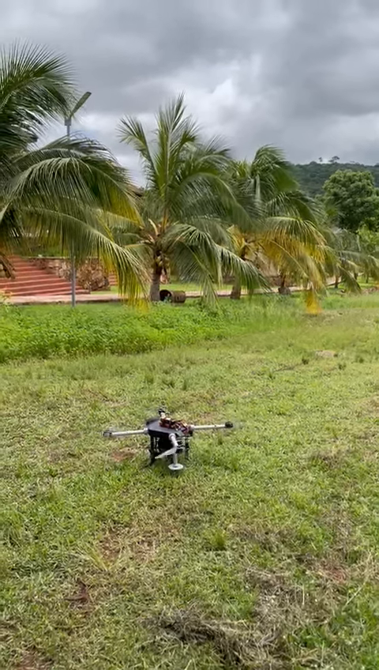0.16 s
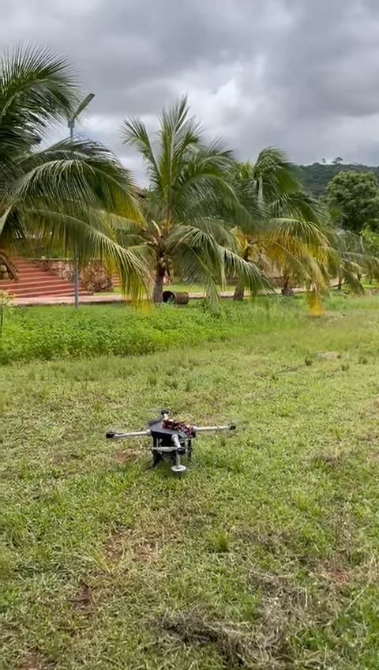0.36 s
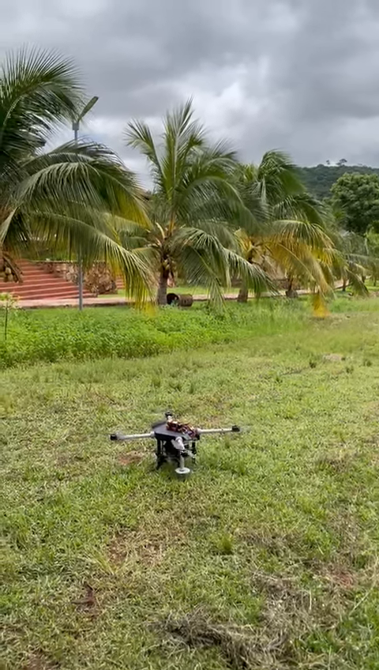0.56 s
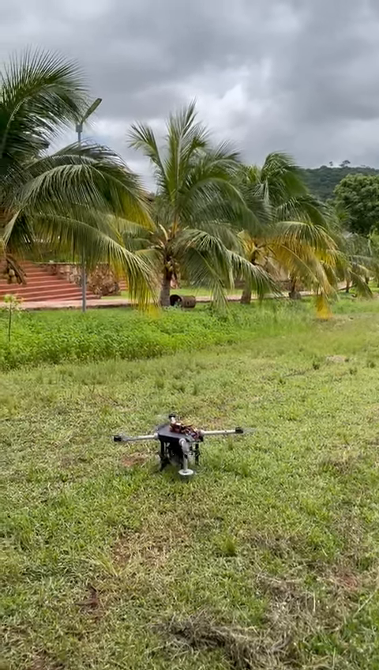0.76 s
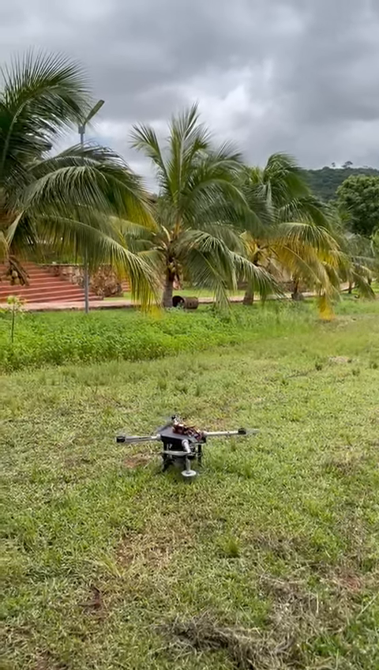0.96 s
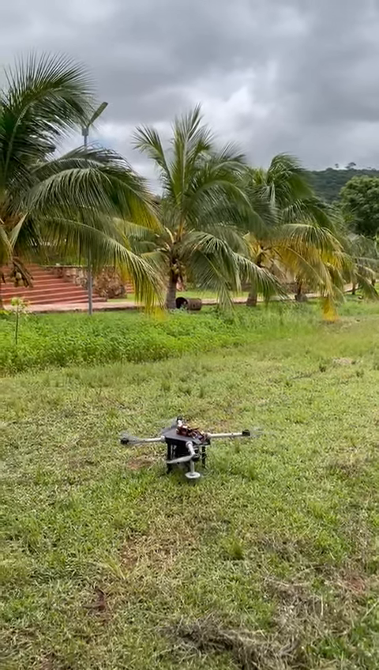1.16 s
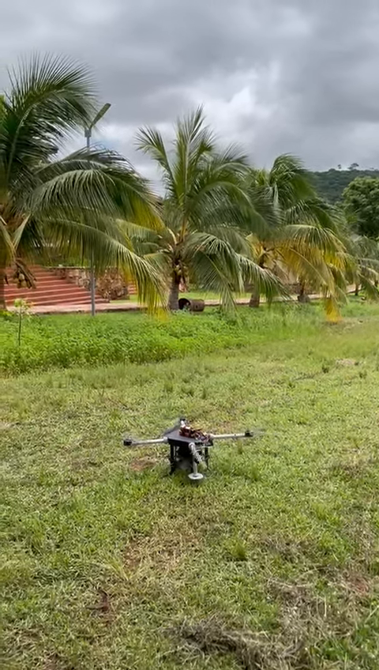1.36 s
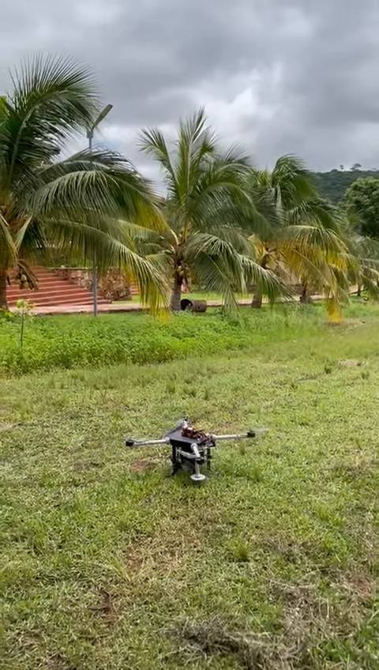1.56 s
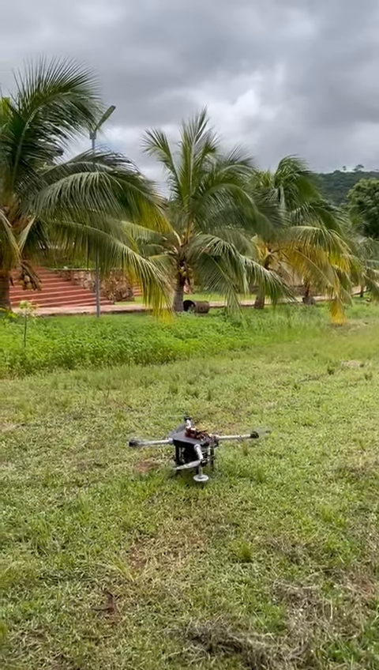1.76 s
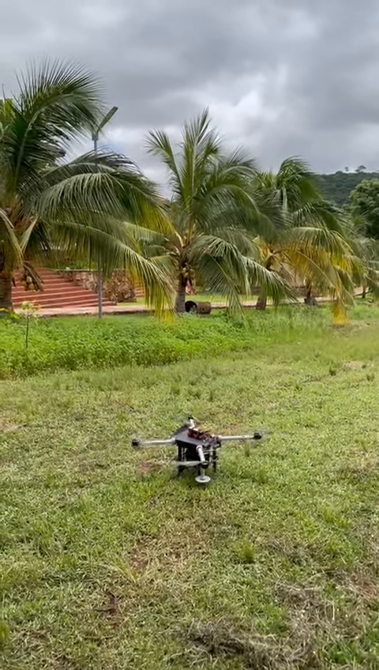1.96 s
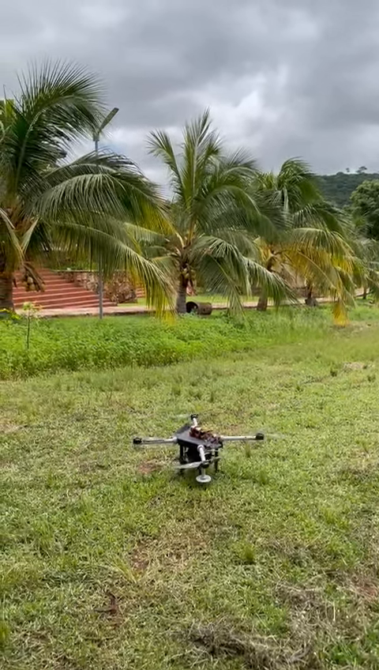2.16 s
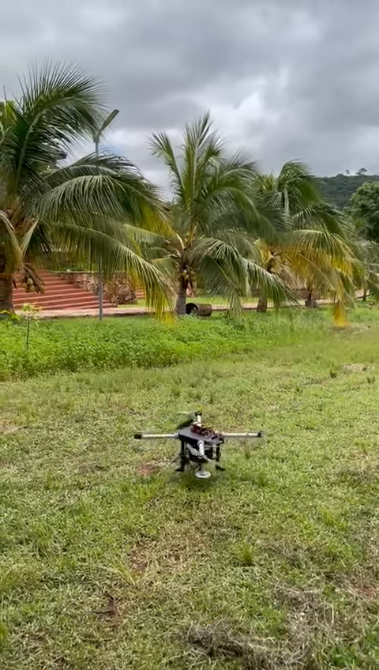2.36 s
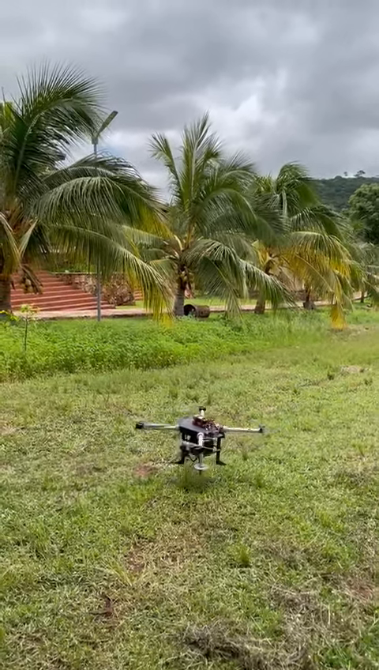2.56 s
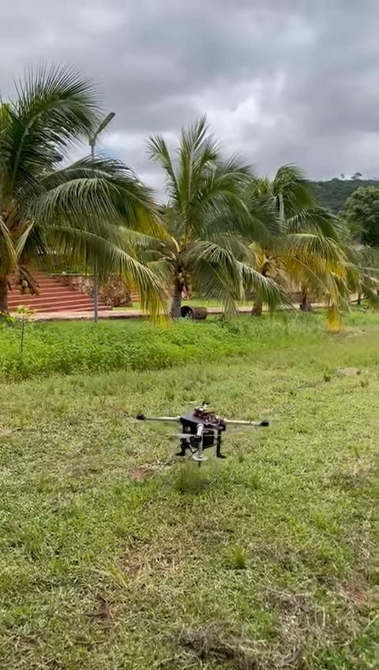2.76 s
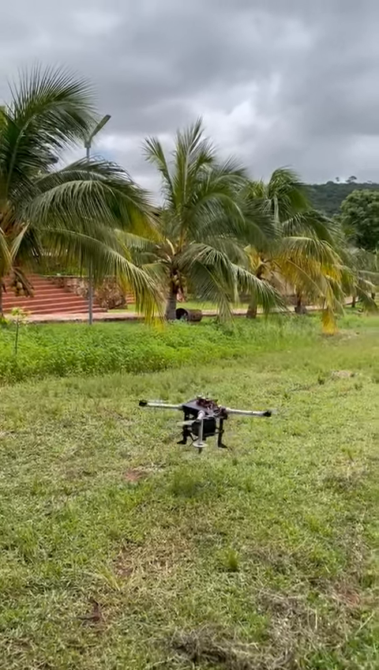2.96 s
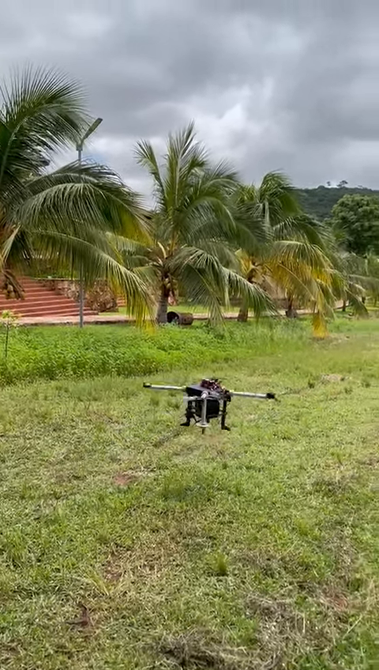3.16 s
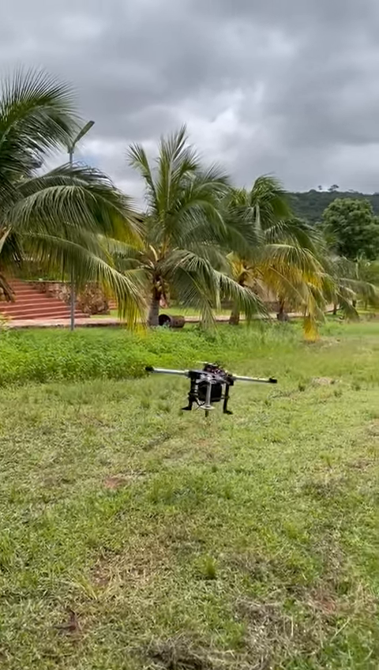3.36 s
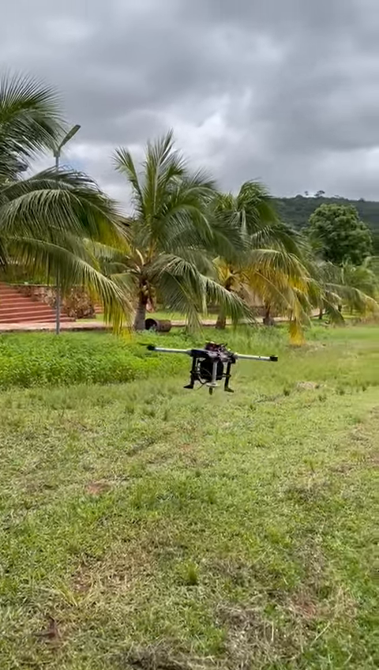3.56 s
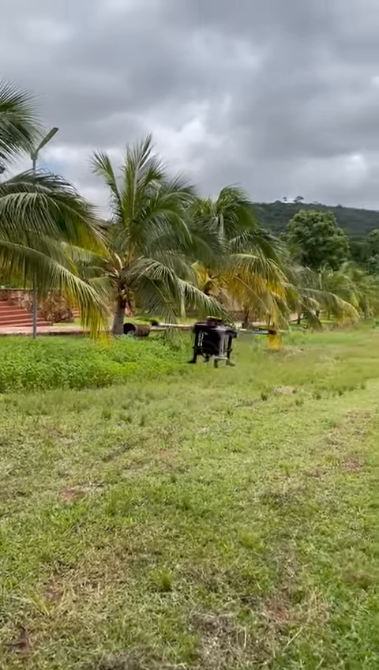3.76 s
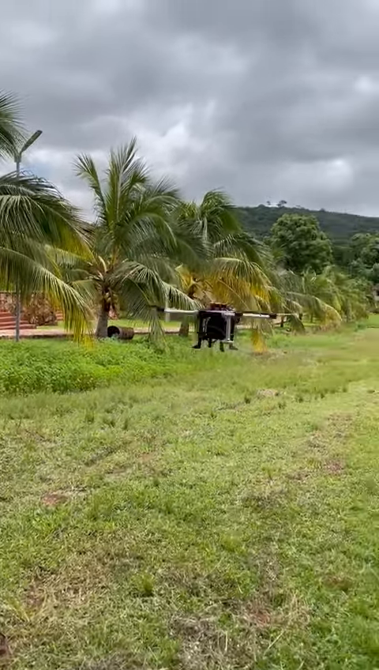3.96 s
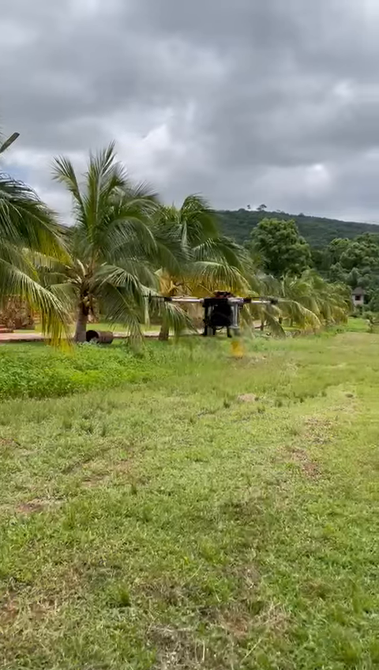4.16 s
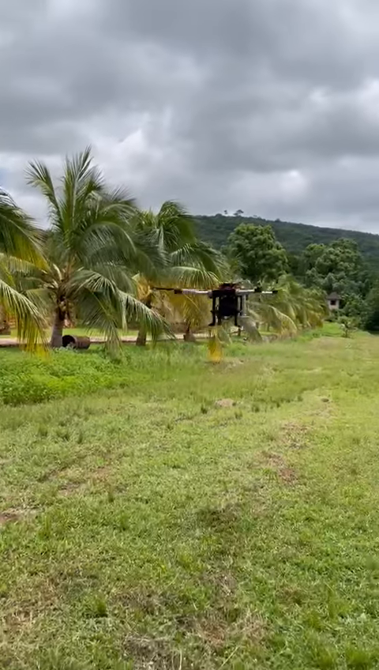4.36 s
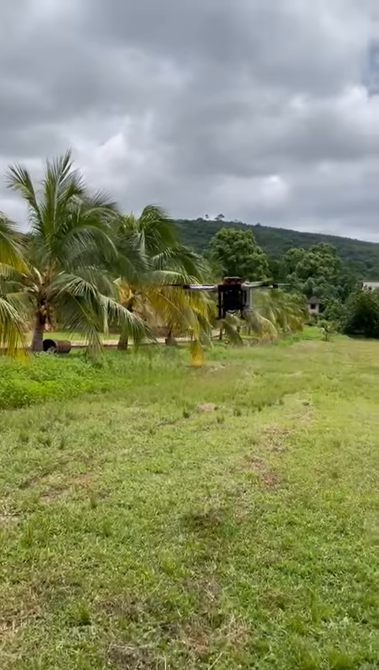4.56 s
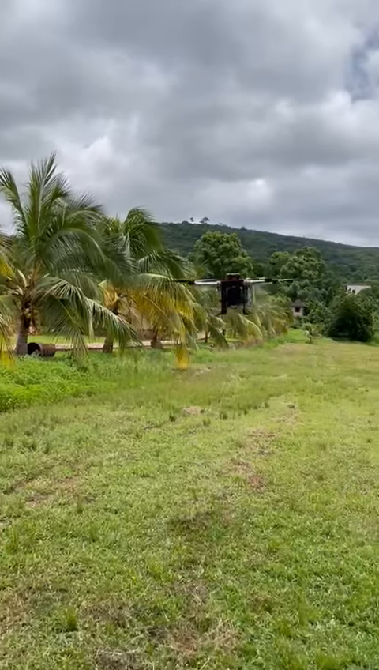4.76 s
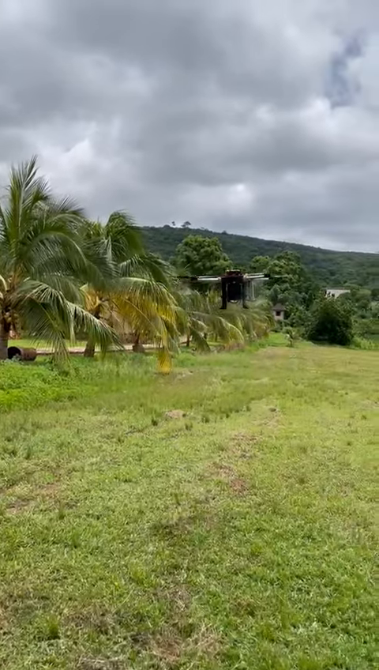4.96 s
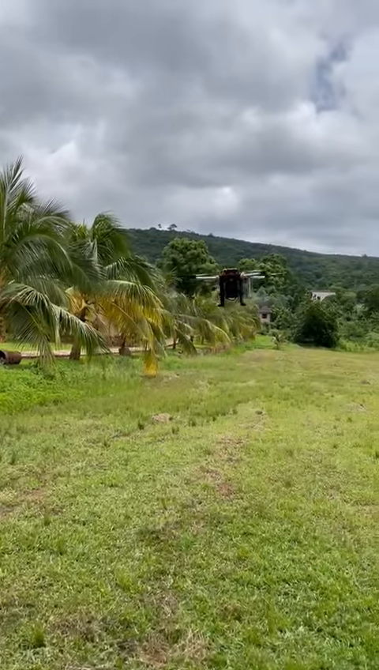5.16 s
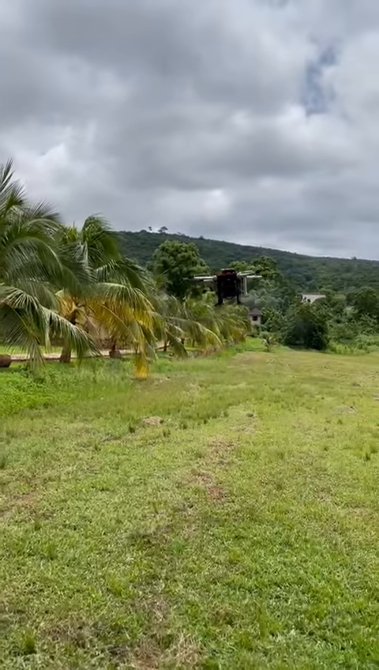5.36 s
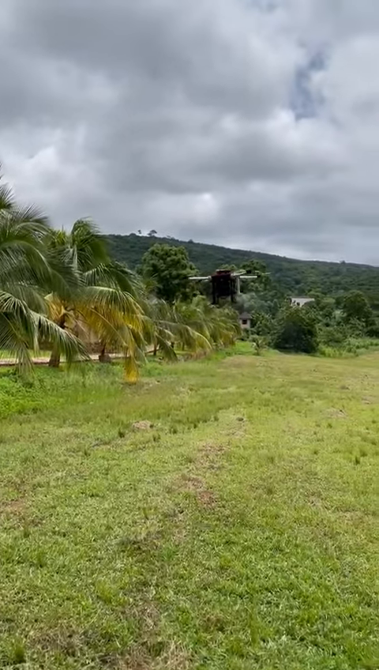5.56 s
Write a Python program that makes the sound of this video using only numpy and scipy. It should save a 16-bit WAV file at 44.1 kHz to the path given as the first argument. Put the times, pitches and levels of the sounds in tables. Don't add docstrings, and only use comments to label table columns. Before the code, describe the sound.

A four-rotor drone's low buzz winds up to a whining roar, lifts off grass, drifts away, and wind thumps the microphone at the end.

```python
import sys
import numpy as np
from scipy import signal
from scipy.fft import rfft, irfft, next_fast_len
from scipy.io import wavfile
from scipy.ndimage import uniform_filter1d

SR = 44100
rng = np.random.default_rng(int(sys.argv[2]) if len(sys.argv) > 2 else 0)


def master(y):
    cut = np.clip(np.atleast_2d(y).T, -1, 1)
    pcm = np.round(cut * 32767)
    wavfile.write(sys.argv[1], SR, pcm.astype(np.int16))


def voltage_ratio(level):
    return 10 ** (np.asarray(level, float) / 20)


N = 247665
TIME = np.arange(N) / SR


def rms_one(x):
    return x / np.sqrt(np.mean(x ** 2) + 1e-20)


def in_time(rows):
    s, *columns = np.transpose(rows)
    return [np.interp(TIME, s, c) for c in columns]


def at_hz(points, hz, axis=1):
    points = np.array(points)
    return np.interp(np.log(hz + 1), np.log(points[:, 0]), points[:, axis])


def drift(rate):
    hop = 40
    r = np.exp(-2 * np.pi * rate * hop / SR)
    noise = rng.standard_normal(N // hop + 2002)
    slow = signal.lfilter([1], [1, -2 * r, r * r], noise)[2000:]
    return np.interp(np.arange(N) / hop, np.arange(len(slow)), rms_one(slow))


def filtered(x, response):
    size = next_fast_len(N + SR // 2)
    hz = np.arange(size // 2 + 1) * SR / size
    return irfft(rfft(x, size) * response(hz), size)[..., :N]


def coloured(x, spectrum):
    return rms_one(filtered(x, lambda hz: voltage_ratio(at_hz(spectrum, hz))))


def drone():
    # (time [s], front left, front right, rear left, rear right [passes/s])
    blade_rates = [(0.0, 73.4, 69.0, 55.0, 57.9), (0.3, 74.8, 70.8, 56.1, 58.2),
                   (0.55, 76.4, 72.2, 57.6, 58.8), (0.7, 77.6, 73.8, 59.6, 60.4),
                   (0.85, 80.7, 78.5, 63.5, 63.5), (1.0, 84.5, 83.5, 69.0, 67.5),
                   (1.26, 94.7, 93.3, 79.8, 75.4), (1.54, 102.3, 100.5, 87.6, 82.0),
                   (1.82, 108.1, 108.0, 97.1, 97.1), (2.1, 117.0, 116.8, 104.5, 103.6),
                   (2.3, 126.0, 124.6, 102.7, 104.0), (2.55, 130.6, 125.0, 99.0, 107.5),
                   (2.72, 131.0, 126.5, 96.8, 108.0), (2.94, 133.4, 132.0, 93.8, 103.7),
                   (3.36, 147.5, 147.5, 81.2, 98.0), (3.5, 149.2, 144.7, 78.2, 100.0),
                   (3.7, 141.8, 139.3, 75.5, 107.5), (3.95, 131.3, 128.2, 77.8, 109.2),
                   (4.04, 131.0, 127.0, 80.0, 110.5), (4.17, 131.6, 128.6, 83.6, 113.0),
                   (4.3, 133.6, 129.3, 87.0, 111.2), (4.41, 134.5, 126.0, 87.6, 107.0),
                   (4.5, 132.6, 124.5, 88.1, 104.6), (4.62, 133.9, 122.5, 88.8, 106.3),
                   (4.77, 132.1, 120.8, 88.8, 106.8), (4.87, 132.4, 120.7, 88.6, 107.3),
                   (4.97, 129.8, 120.3, 90.5, 107.0), (5.15, 127.1, 119.5, 95.0, 106.3),
                   (5.4, 129.0, 121.4, 94.0, 106.3), (5.62, 129.5, 123.5, 93.0, 105.0)]
    # (time [s], height [m])
    climb = [
        (2.3, 0.19),
        (2.6, 0.27),
        (3.05, 0.37),
        (3.4, 0.77),
        (3.7, 1.3),
        (4.0, 1.2),
        (4.3, 1.47),
        (5.62, 1.57),
    ]
    # (tone level [dB], tone slope [dB per doubling of speed], whine level [dB],
    # hiding by nose tilt [dB per pass/s], lift of the lowest tone [dB])
    rotor_levels = [
        (-51, 28, -63, 0, 5),
        (-52, 24, -66, 0, 5),
        (-38.5, 17, -59, .4, -7),
        (-49, 12, -60, .3, -5),
    ]
    speeds = in_time(blade_rates)
    height = np.maximum(in_time(climb)[0], 0)
    tilt = speeds[0] - speeds[2]
    ground_lift_db = 5 * np.exp(-(height / 0.28) ** 2)
    mix, air = 0, 0
    for per_s, levels in zip(speeds, rotor_levels):
        tone_db, whine_db, lowest_db = motor_db(per_s, tilt, ground_lift_db, *levels)
        tones, whine, chop = rotor(per_s, tone_db, whine_db, lowest_db, height)
        mix = mix + tones + whine
        air = air + chop
    thrust = np.log2(np.mean(speeds, axis=0) / 100)
    return mix + air_noise(air, thrust, height) + flares() + switching(speeds[0])


def motor_db(per_s, tilt, lift_db, tone_db, slope_db, whine_db, hidden_db, lowest_db):
    ceiling_db, hidden_from = -40, 38
    doublings = np.log2(per_s / 100)
    hidden = hidden_db * np.maximum(tilt - hidden_from, 0)
    tone = np.minimum(tone_db + slope_db * doublings, ceiling_db) - hidden + lift_db
    speeding_up = uniform_filter1d(np.gradient(per_s) * SR, size=SR // 5)
    surge_db = 5.5 * np.tanh(speeding_up / 25)
    return tone, whine_db - hidden + 4 * doublings + surge_db, lowest_db


def rotor(per_s, tone_db, whine_db, lowest_db, height):
    unsteady = per_s * (1 + .0025 * drift(4.0))
    turn = 2 * np.pi * (np.cumsum(unsteady) / SR + rng.random())
    tones = voltage_ratio(tone_db) * blade_tones(per_s, turn, lowest_db, height)
    whine = motor_whine(per_s, turn, whine_db)
    chop = (1 + 0.38 * np.cos(turn)) * per_s / 100 * rng.standard_normal(N)
    return tones, whine, chop


def blade_tones(per_s, turn, lowest_db, height):
    # (frequency [Hz], level [dB])
    blade_spectrum = [(50, 1.5), (130, -1.5), (250, -2), (400, -4), (600, 2.5), (930, -1.5), (1060, -2),
                      (1250, -5.5), (1600, -9), (2300, -16.5)]
    flutter = .08 * drift(12.0)
    upper_lift_db = 2 * np.exp(-((height - .55) / .22) ** 2)
    below_sharp = np.maximum(np.log2(125 / per_s), 0)
    tones = 0
    for k in range(1, 16):
        db = at_hz(blade_spectrum, k * per_s) + 3.5 * drift(8.0)
        if k == 1:
            db = db + lowest_db - 4.5 * height
        if k > 5:
            db = db + upper_lift_db
        if k > 8:
            db = db - 1.5 * height
        db = db - 2.0 * max(k - 3, 0) * below_sharp
        tones = tones + voltage_ratio(db) * np.sin(k * (turn + flutter) + 7 * rng.random())
    return tones


def motor_whine(per_s, turn, whine_db):
    # (multiple of blade rate, level [dB])
    upper_whines = [(70, 0), (74, -6), (84, -3)]
    overtone_db, bell_hz, bell_half_width = -44, 9100, 500
    speed = per_s / 100
    wobble = 1.15 * speed ** .6 * np.sin(turn) + .3 * np.sin(turn / 2) + .1 * speed ** 2 * drift(35.0)
    low = voltage_ratio(2.8 * drift(14.0)) * frame_gain(42 * per_s) * np.sin(42 * turn + wobble)
    high = 0
    for k, db in upper_whines:
        ring = 1 / (1 + ((k * per_s - bell_hz) / bell_half_width) ** 2)
        high = high + voltage_ratio(db + 4.0 * drift(6.0)) * ring * np.sin(k * turn + wobble / 3)
    return voltage_ratio(whine_db) * low + voltage_ratio(overtone_db) * high


def frame_gain(hz):
    # (frequency [Hz], width [Hz], level [dB])
    resonances = [(2380, 150, 21), (3540, 220, 14), (4200, 700, 6), (5540, 600, 17), (6250, 500, 11)]
    return sum(voltage_ratio(db) / (1 + (2 * (hz - mid) / width) ** 2) for mid, width, db in resonances)


def flares():
    # (time [s], frequency [Hz], level [dB], length [s])
    arm_rings = [
        (0.7, 3130, -46, 0.04),
        (1.08, 2470, -36, 0.078),
        (1.343, 4150, -37.5, 0.05),
        (1.53, 2530, -39, 0.0075),
        (1.566, 3400, -40, 0.033),
        (1.875, 4390, -34, 0.057),
        (2.3, 5320, -36.5, 0.12),
        (3.72, 2380, -38.5, 0.035),
    ]
    out = 0
    for s, hz, db, length in arm_rings:
        band = signal.butter(2, [hz - 130, hz + 130], "band", fs=SR, output="sos")
        narrow = signal.sosfilt(band, rng.standard_normal(N))
        out = out + voltage_ratio(db) * np.exp(-((TIME - s) / length) ** 2) * rms_one(narrow)
    return out


def air_noise(air, thrust, height):
    # (frequency [Hz], density [dB per Hz])
    wash_colour = [(60, -24), (130, -4.5), (250, 3), (450, 9), (650, 9.5), (1000, -5.5), (1600, -16),
                   (2500, -26.5)]
    hiss_colour = [(600, -17), (1150, 5.5), (1600, 1.5), (2300, 13), (3100, 6), (4300, -3.5), (5200, -15.5),
                   (7000, -73)]
    tips_colour = [(3500, -3), (4400, -7), (4850, -8), (5400, 2), (6500, -1), (7600, -7), (8500, 0),
                   (9100, 5.5), (9800, -9), (11000, -6), (12000, -23)]
    wash_db, hiss_db, tips_db = air_db(thrust, height)
    air = air / np.sqrt(uniform_filter1d(air ** 2, size=SR // 8))
    wash = voltage_ratio(wash_db + 1.5 * drift(6.0)) * coloured(air, wash_colour)
    hiss = voltage_ratio(hiss_db + 0.72 * drift(8.5)) * coloured(air, hiss_colour)
    tips = voltage_ratio(tips_db + 1.12 * drift(15.0)) * coloured(air, tips_colour)
    dull = signal.lfilter([.7], [1, -.3], wash + hiss)
    extra_path_ms = 0.23 + 0.39 * (1 - np.exp(-height / 0.93))
    echo = np.interp(TIME - extra_path_ms / 1000, TIME, dull)
    echo_share = .95 * np.exp(-(height / .7) ** 2)
    return wash + hiss - echo_share * echo + tips


def air_db(thrust, height):
    ear_m, edge_on_share = 1.526, 0.061
    on_grass = voltage_ratio(np.minimum(-26.5 + 34 * thrust, -24.5)) * np.exp(-(height / 0.25) ** 2)
    aloft = voltage_ratio(-44.5) * (height > 0)
    beam = np.abs(1 - height / ear_m) + edge_on_share
    wash_db = 20 * np.log10(on_grass + aloft)
    hiss_db = -38.5 + 24.5 * thrust + 20 * np.log10(beam)
    tips_db = -37 + 18.5 * thrust - 5.5 * height
    return wash_db, hiss_db, tips_db


def switching(front_per_s):
    carrier = 2 * np.pi * 8010 * TIME
    whistle = voltage_ratio(-51 + 2.3 * drift(15.0)) * np.sin(carrier + .3 * drift(3.7))
    turn = 2 * np.pi * np.cumsum(front_per_s) / SR
    folded = np.sin(carrier - 42 * turn) + .5 * np.sin(carrier - 43.5 * turn)
    folded_db = -51 - 3 * np.maximum(front_per_s - 83, 0)
    return whistle + voltage_ratio(folded_db) * folded


def wind():
    # (frequency [Hz], density [dB per Hz])
    wind_colour = [(20, -20), (45, -3), (70, 1), (120, 0), (200, -6), (350, -15), (600, -55), (3000, -99)]
    # (time [s], peak level [dB], frequency [Hz], push 1 or pull -1)
    eddies = [(5.118, -8, 230, -1), (5.146, -14, 140, -1), (5.164, -15, 130, 1), (5.427, -20, 103, -1),
              (5.49, -13, 75, 1), (5.52, -17, 180, -1), (5.5907, -15, 620, 1), (5.5922, -9.5, 400, 1),
              (5.5997, -16, 450, 1), (5.6005, -10, 143, -1), (5.6057, -15, 220, 1)]
    own_share = .3
    shared, left, right = rng.standard_normal((3, N))
    noise = coloured(np.array([shared + own_share * left, shared + own_share * right]), wind_colour)
    onset = np.clip((TIME - 4.1) / 0.3, 0, 1)
    out = onset * gusts() * voltage_ratio(2.2 * drift(36.0)) * noise
    for s, db, hz, push in eddies:
        cycles = (TIME - s) * hz - .8
        thump = np.exp(-(cycles / 0.5) ** 2) * np.cos(2 * np.pi * cycles)
        out = out + np.sign(push) * voltage_ratio(db) * thump
    return out


def gusts():
    # (time [s], peak level [dB], fade [s])
    gust_peaks = [
        (4.256, -62, 0.021),
        (4.66, -48, 0.091),
        (4.794, -31, 0.016),
        (4.928, -34, 0.0087),
        (5.14, -21.5, 0.053),
        (5.3, -34.5, 0.02),
        (5.432, -31, 0.012),
        (5.494, -26.5, 0.11),
        (5.616, -25, .05),
    ]
    rise_s, breeze_db = 0.035, -46.5
    out = voltage_ratio(breeze_db)
    for s, db, fade in gust_peaks:
        out = out + voltage_ratio(db) * np.exp(-np.maximum((s - TIME) / rise_s, (TIME - s) / fade))
    return out


def field():
    # (frequency [Hz], level [dB])
    engine_tones = [(74.6, -40.5), (121, -46.5)]
    # (frequency [Hz], density [dB per Hz])
    field_colour = [(25, 5), (45, -18), (75, 1.5), (130, -10.5), (250, -19.5), (600, -58), (2000, -21),
                    (8000, -30)]
    hum = 0
    for hz, db in engine_tones:
        phase = 2 * np.pi * hz * TIME + 0.8 * drift(5.2)
        hum = hum + voltage_ratio(db + 0.72 * drift(16.0)) * np.sin(phase)
    rumble = coloured(rng.standard_normal(N), field_colour)
    return hum + voltage_ratio(-34.5 + 1.2 * drift(4.4)) * rumble


def ports(x):
    # (frequency [Hz], left over right [dB], left's lead [half turns each side],
    # share of scattered sound [0-1])
    port_response = [(40, 1.7, 0, .04), (110, 4.5, 0, .12), (220, 12.5, -.015, .3), (390, 8.5, -.22, .55),
                     (480, 10.5, -.33, .6), (620, 4, -.37, .08), (800, .3, -.33, .15), (1050, -6, -.2, .2),
                     (1300, 0, 0, .02), (1800, 0, 0, .006), (2400, .8, .01, .02), (3300, 0, .015, .015),
                     (4200, 0, .11, .1), (4600, 0, .3, .15), (4800, 1.8, .49, .12), (5000, 0, .95, 0),
                     (5700, 0, 1.01, 0), (6500, 0, 1.05, .08), (7300, 0, 1.27, .5), (8000, 0, 1.35, .12),
                     (8450, 0, 1.47, 0), (8950, 0, 1.415, 0), (9600, 0, 1.45, 0), (11000, 0, 1.43, 0)]
    tail = rng.standard_normal(SR // 8) * np.exp(-TIME[:SR // 8] / 0.012)
    scattered = signal.fftconvolve(x, tail / np.sqrt(np.sum(tail ** 2)))[:N]

    def port(hz, side):
        db = at_hz(port_response, hz)
        lead = at_hz(port_response, hz, axis=2)
        even = np.sqrt(2 / (voltage_ratio(db) + voltage_ratio(-db)))
        return even * voltage_ratio(side * db / 2) * np.exp(1j * np.pi * side * lead)

    def share(hz):
        return np.clip(at_hz(port_response, hz, axis=3), 0, 1)

    left = filtered(x, lambda hz: port(hz, 1))
    right = filtered(x, lambda hz: port(hz, -1) * np.sqrt(1 - share(hz)))
    right_scattered = filtered(scattered, lambda hz: port(hz, -1) * np.sqrt(share(hz)))
    return np.array([left, right + right_scattered])


def scene():
    return ports(drone() + field()) + wind()


def band_limit(x):
    return signal.sosfilt(signal.butter(12, 11620, fs=SR, output="sos"), x)


def record(dry):
    low_cut = signal.butter(2, 40, "high", fs=SR, output="sos")
    mix = signal.sosfiltfilt(low_cut, dry)
    mix = mix * np.clip((TIME[-1] - TIME) / 0.0015, 0, 1)
    return band_limit(mix)


dry = scene()
out = record(dry)
master(out)
```